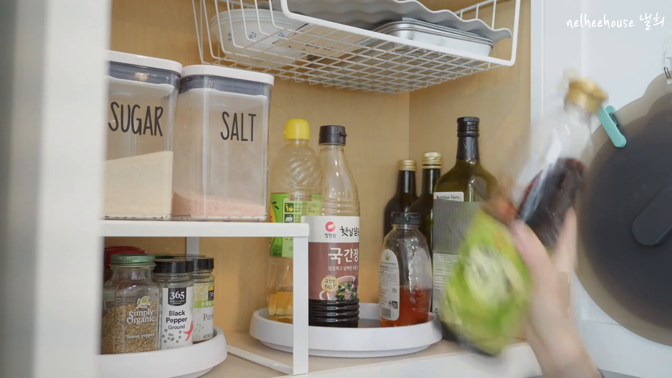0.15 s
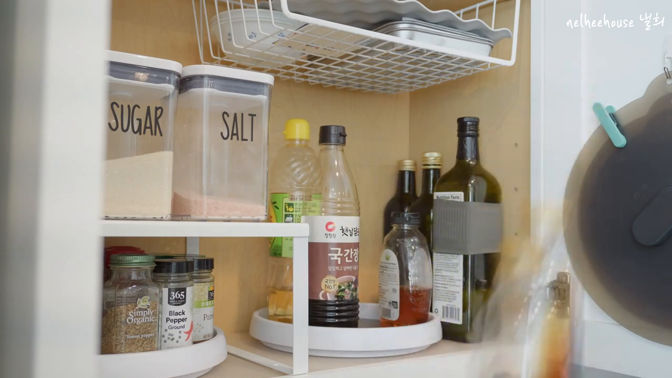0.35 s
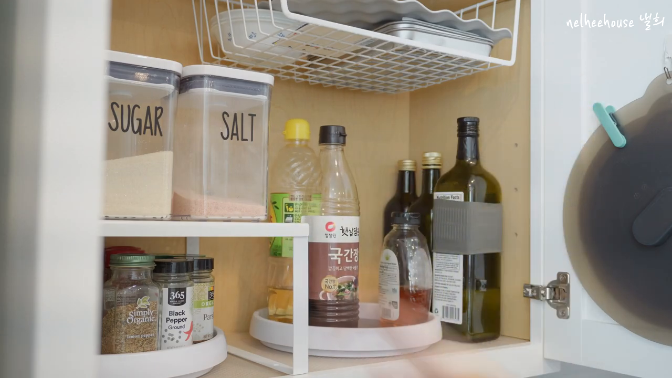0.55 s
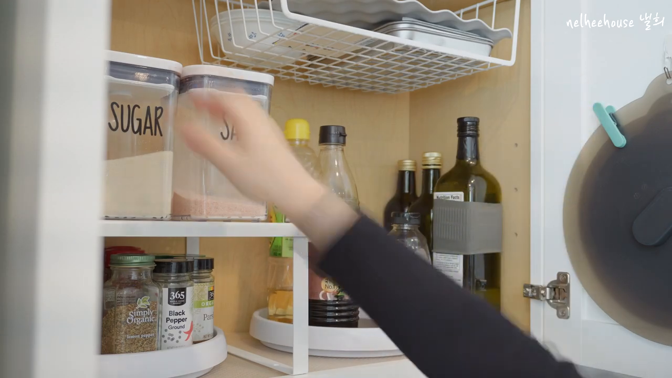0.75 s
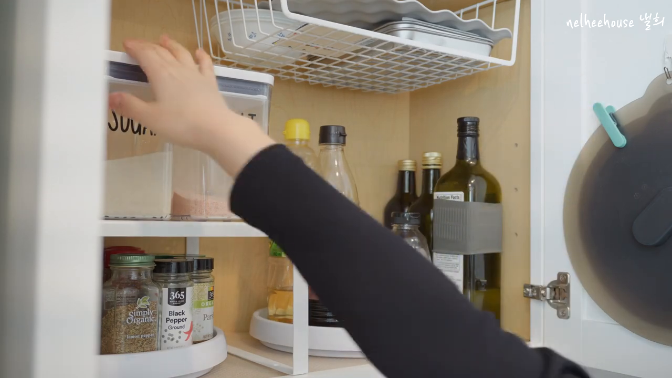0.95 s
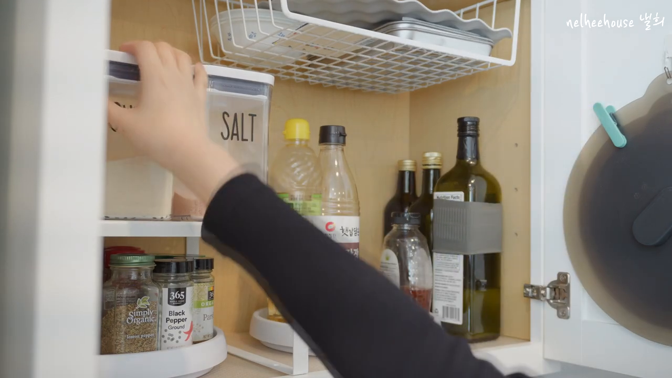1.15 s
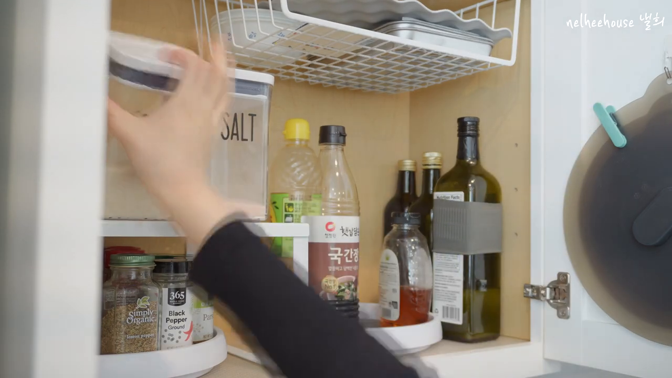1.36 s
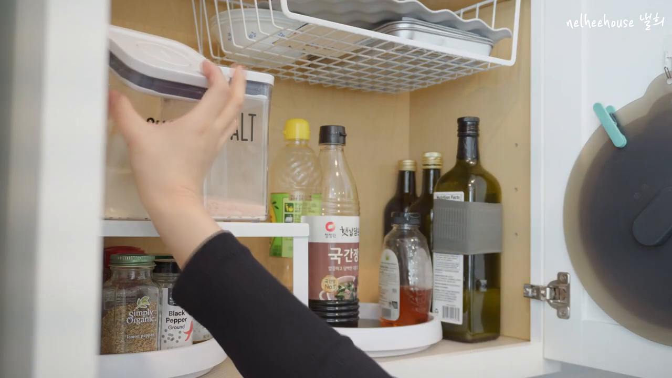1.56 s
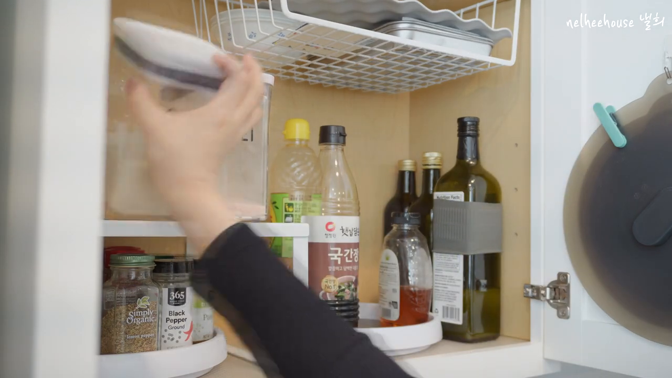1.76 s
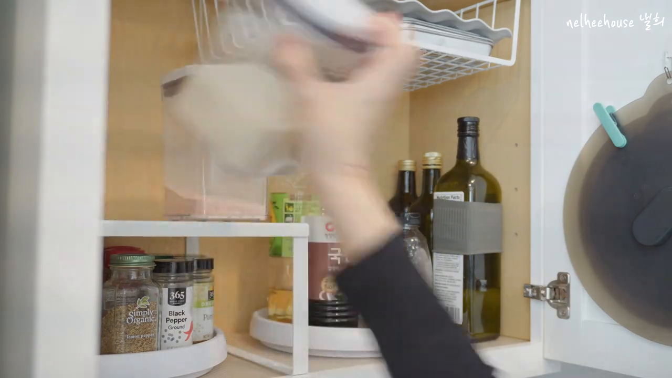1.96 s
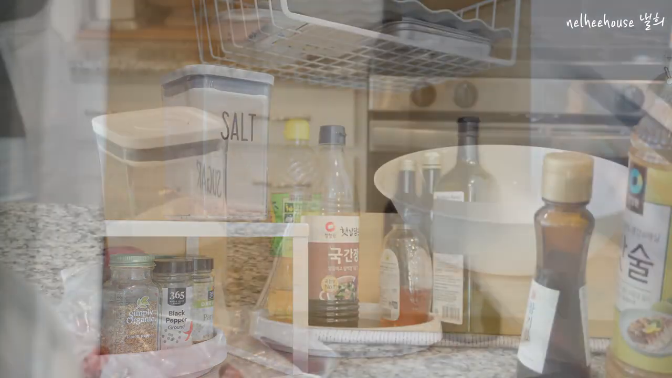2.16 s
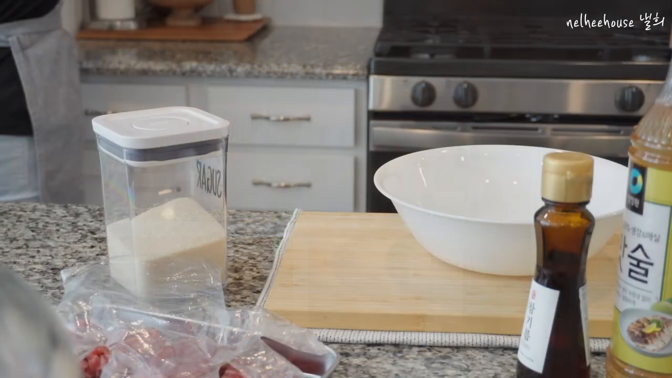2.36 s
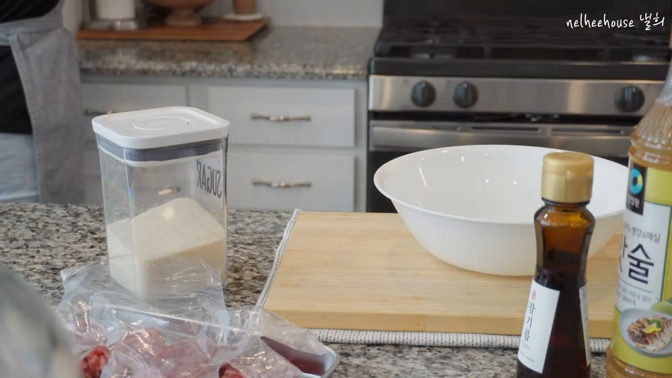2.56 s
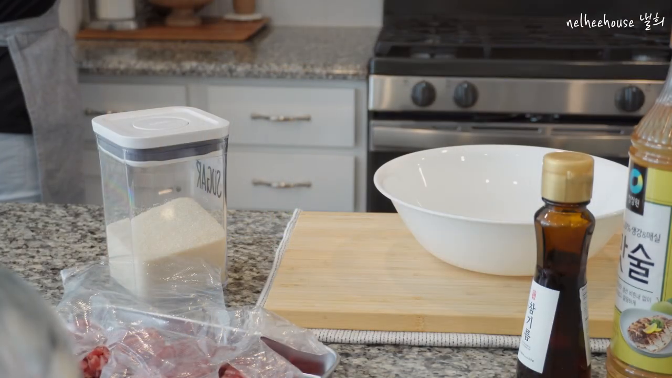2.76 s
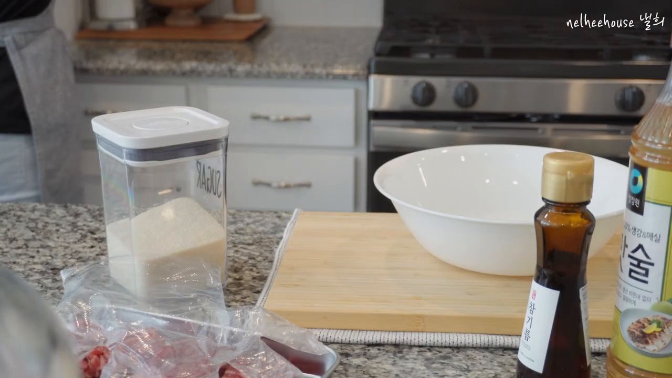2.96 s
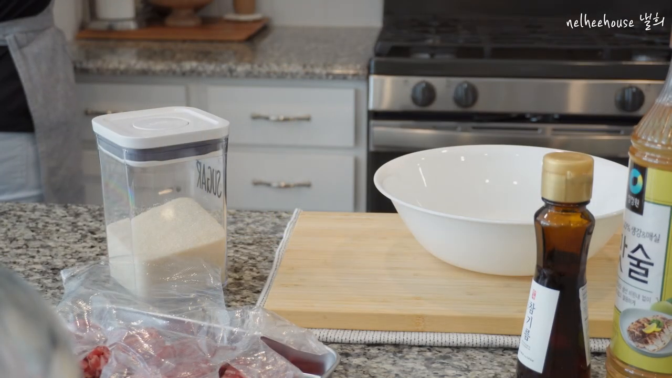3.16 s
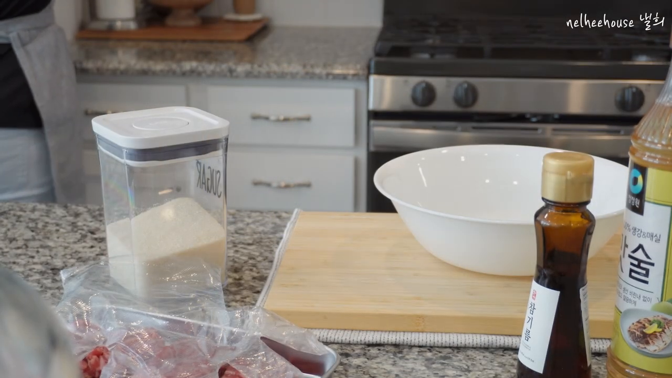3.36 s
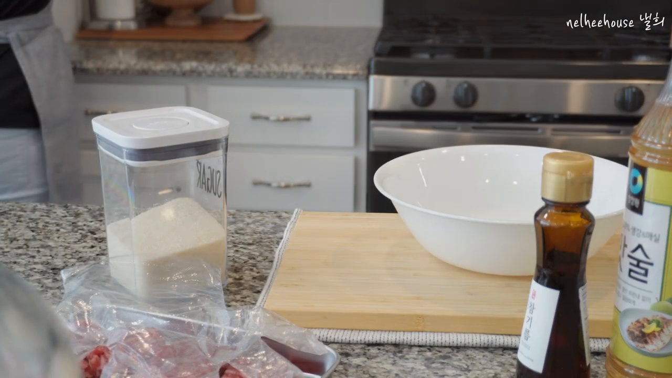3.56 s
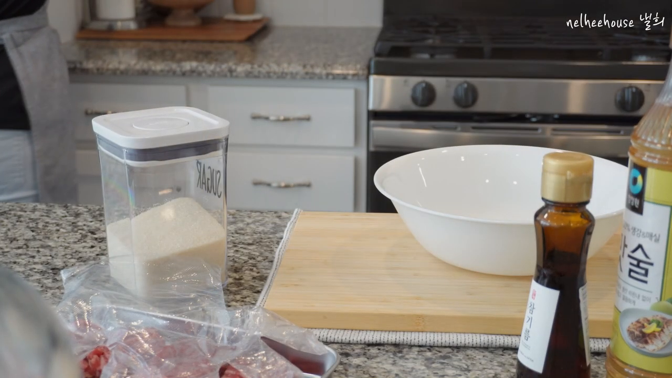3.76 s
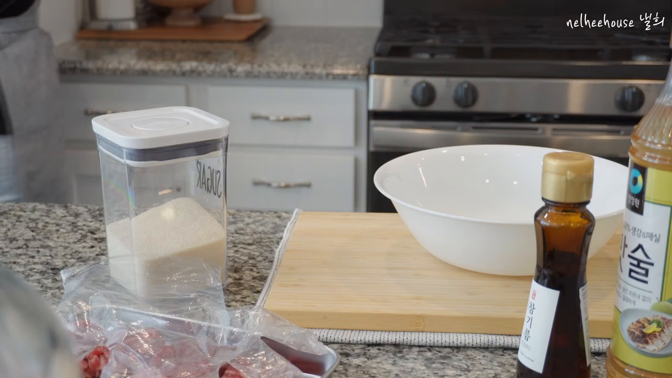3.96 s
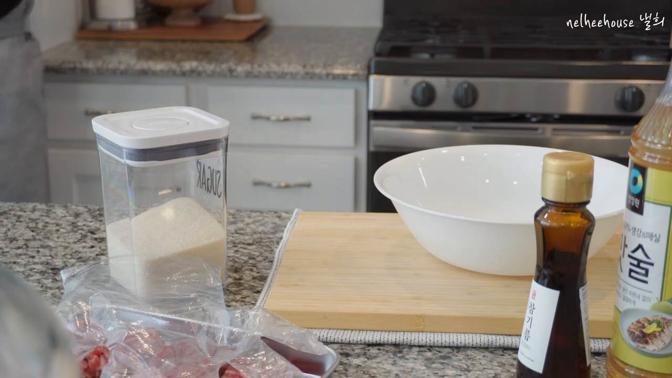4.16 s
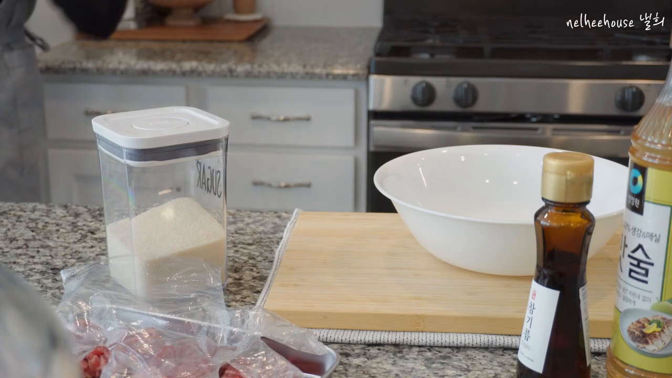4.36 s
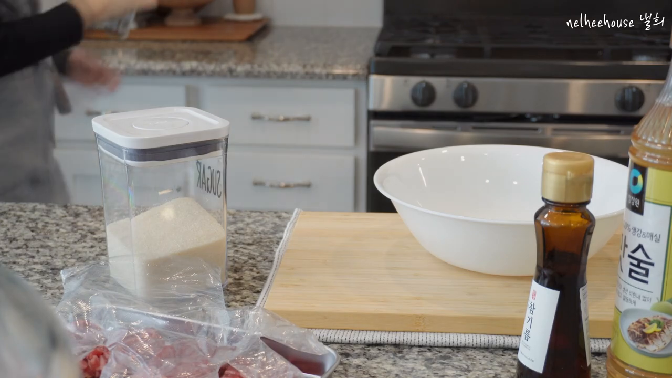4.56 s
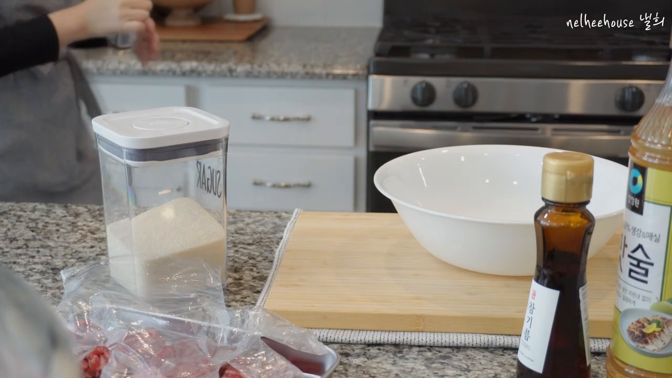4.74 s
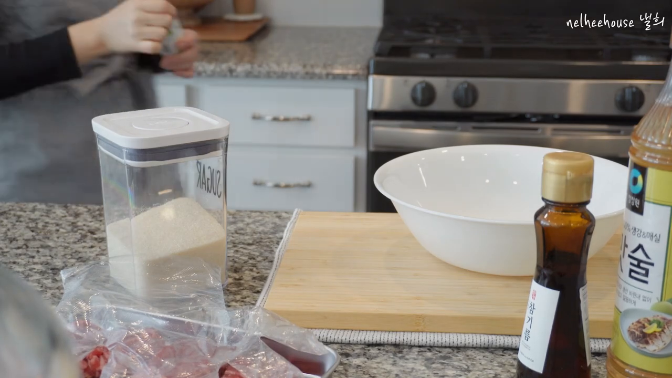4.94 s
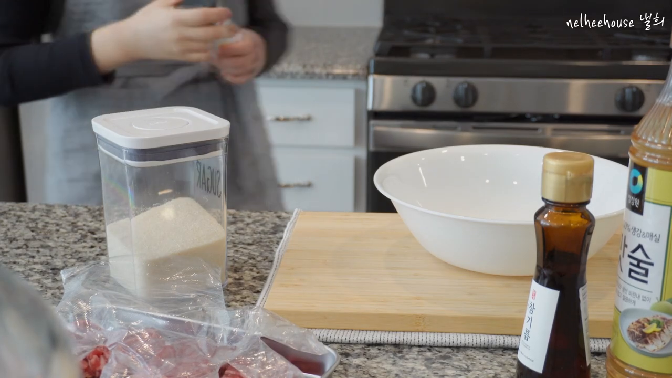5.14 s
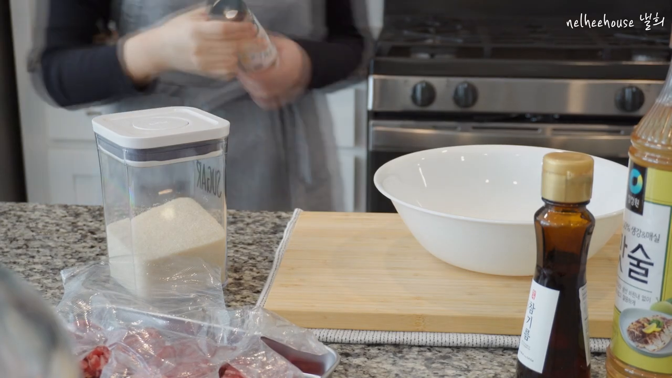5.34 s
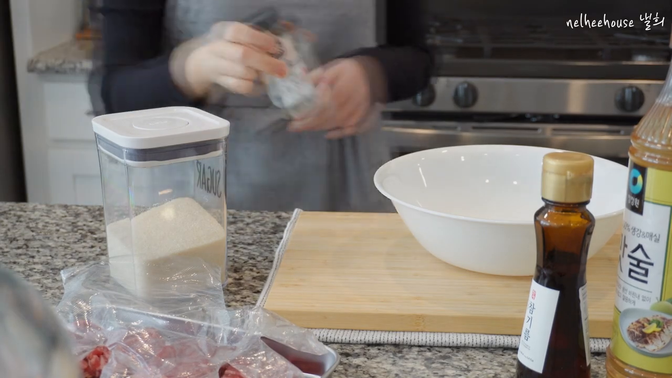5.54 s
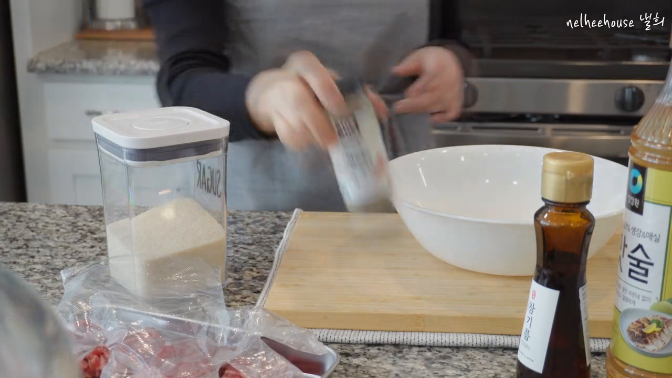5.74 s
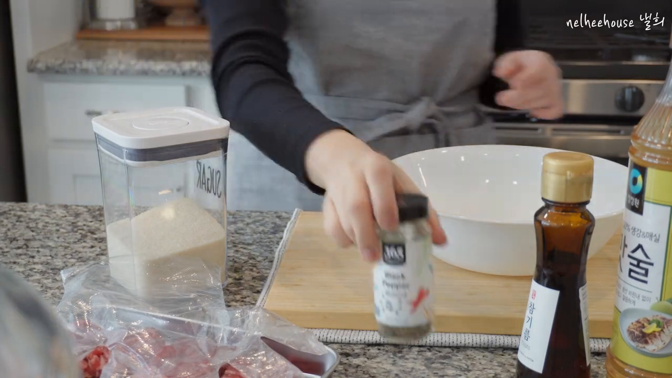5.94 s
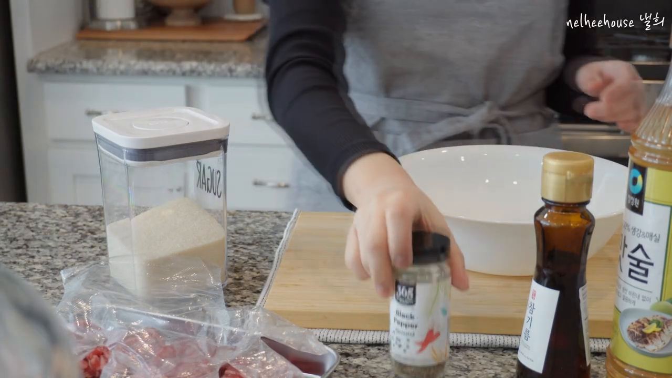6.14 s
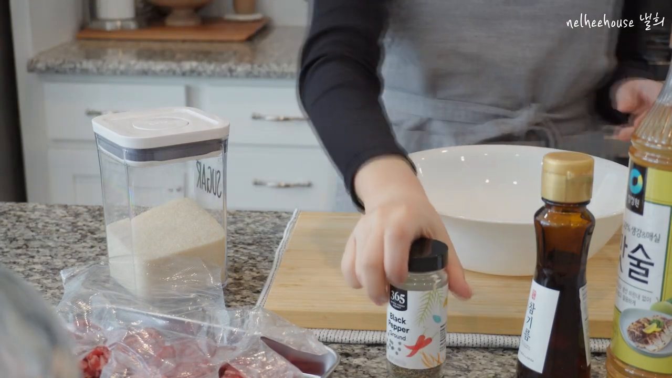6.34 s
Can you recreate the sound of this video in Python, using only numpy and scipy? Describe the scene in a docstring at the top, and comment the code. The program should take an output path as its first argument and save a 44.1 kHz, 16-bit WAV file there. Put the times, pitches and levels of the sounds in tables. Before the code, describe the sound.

At the very start, bottles bump each other and a cupboard shelf in a quick cluster, with a brush of sleeve. Around 0.5 seconds a hollow plastic canister taps and scrapes briefly, slightly to the left. Faint plastic ticks and dull shelf knocks follow until about 1.9 seconds. At 2.5 seconds small glass jars touch with a light tinkle, and cloth and thin plastic rustle softly. A clack comes from across the kitchen at 3.6 seconds. Jars clink at 3.9, and right after, just past 4 seconds, a cupboard door bangs loudly and shudders. Three light slipper steps slap closer at about 4.9, 5.4 and 5.9 seconds, with a soft distant knock at 5.1. At 6.3 seconds a full jar lands sharply on a stone counter, rocking for an instant. Hard walls give about a second of echo, over faint hiss and fridge hum.

```python
"""A kitchen with hard, echoing walls. A hand shifts bottles and a plastic canister in a cupboard; then small
glass jars clink, a cupboard door bangs, slippers slap closer and a jar is set down on a stone counter.
Each blow is a cluster of short contacts plus the damped modes, if any, of the thing struck.
Dense slips make the canister scrape, cloth rubs as flickering noise, and a fridge hums under room hiss."""
import sys
import numpy as np
from scipy import signal
from scipy.fft import rfft, irfft
from scipy.io import wavfile
from scipy.ndimage import uniform_filter1d

SR = 44100
rng = np.random.default_rng(int(sys.argv[2]) if len(sys.argv) > 2 else 0)


def bounce(signal):
    """Save signal as a 16-bit WAV file at the path given by the first command-line argument."""
    frames = np.transpose(np.atleast_2d(signal))
    limited = np.clip(frames, -1, 1)
    pcm = np.round(limited * 32767).astype(np.int16)
    wavfile.write(sys.argv[1], SR, pcm)


N = 282240
T = np.arange(N) / SR
# Stereo width of diffuse sound. Each row: frequency in Hz, side minus mid in dB.
SIDE_SHARE = [(60, -24), (250, -23), (700, -17), (2000, -13.5), (5000, -9), (10000, -5)]


def blows(hits, modes, width, thud_hz, thud_db, body_db, pan_db, spread_ms,
          ring_room_db=-12, body_hz=1150, rise_ms=0.012):
    """Contact clusters (crack, thud, body, tick) plus ringing modes; returns direct sound and room feed.
    Each hit: start in seconds, level in dB, crack in Hz, treble in dB, room send in dB.
    Each mode: frequency in Hz, level in dB, T60 in seconds."""
    direct, feed, size = np.zeros((2, N + SR)), np.zeros(N + SR), SR // 2
    t = np.arange(size) / SR
    fade = np.exp(-t * 1000 / spread_ms)
    rise = 1 - np.exp(-(t + 1 / SR) * 1000 / rise_ms)
    for start_s, db, crack_hz, treble_db, room_db in hits:
        force = crackle(0.97, size) * fade
        force[0] = 1.33  # clean first touch
        force = whiten(force) * fade ** 0.13 * rise  # short contacts have no pitch of their own
        force = whiten(force) * fade ** 0.096
        force = whiten(force) * fade ** 0.057
        crack = bandpass(force, crack_hz / (1 + width), crack_hz * (1 + width) ** 0.43)
        thud = bandpass(force, thud_hz / 2.14, thud_hz * 1.94)
        body = bandpass(force, body_hz / 1.505, body_hz * 1.76)
        tick = resonate(resonate(bandpass(force, 5000, 14000), 4400, 3250), 7000, 12000)
        parts = (crack, 0), (thud, thud_db), (body, body_db), (tick, treble_db)
        contact = sum(undb(part_db) * part / np.abs(part).max() for part, part_db in parts)
        ring = np.zeros(size)
        for mode_hz, mode_db, t60_s in modes:
            # harder, brighter contacts reach the high modes
            reach_db = 0.72 * (treble_db + 17) * np.clip(np.log2(mode_hz / 3000), 0, 1)
            swell = 1 - np.exp(-t * mode_hz / 3)
            ring += undb(mode_db + reach_db) * swell * decay(t, t60_s) * np.sin(2 * np.pi * mode_hz * t)
        i = int(start_s * SR)
        direct[:, i:i + size] += undb([[db + pan_db / 2], [db - pan_db / 2]]) * (contact + ring)
        feed[i:i + size] += undb(db + room_db) * (contact + undb(ring_room_db) * ring)
    return direct[:, :N], feed[:N]


def door_bang():
    """The cupboard door meets its frame and shudders."""
    hits = [(4.0423, -7.5, 2980, -4.5, 4), (4.0455, -12, 3670, -12, 5), (4.049, -6, 3460, -6, -1.5),
            (4.059, -8, 2460, -22, -13)]  # all hit and mode rows as in blows()
    modes = [(180.6, -18.5, 0.16), (255.1, -27, 0.63), (662.4, -22.5, 0.27), (888, -23, 0.089),
             (1020, -23, 0.081), (1337, -21, 0.11), (1562, -10, 0.063), (1900, -24, 0.16),
             (2334, -16, 0.25), (2317, -18, 0.31), (2940, -9.5, 0.13), (3336, -10.5, 0.18),
             (3854, -20, 0.21), (4470, -25, .15), (4447, -20.5, 0.25), (4996, -24, 0.046), (5230, -27, .03),
             (5760, -23.5, 0.12)]
    return blows(hits, modes, width=1.18, thud_hz=323, thud_db=-17.5, body_db=-4.5, pan_db=-1,
                 spread_ms=5.9, ring_room_db=-5.5)


def jar_landing():
    """A full jar lands and rocks on stone."""
    hits = [(6.312, -9.5, 3240, -13.5, -0.25), (6.3225, -11.5, 3500, -43, -0.71),
            (6.3308, -12, 2950, -39, -2.4), (6.3365, -7, 3100, -40, 1)]
    modes = [(214, -27.5, 0.26), (399, -14.5, 0.052), (710, -16, 0.031), (1008.6, -12.5, 0.15),
             (1140, -19, 0.077), (1650, -10.5, 0.024), (2120, -7.5, 0.023), (2720, 7.5, 0.0079),
             (2905, -8, 0.015), (3420, -6.5, 0.023), (4100, -11, 0.0077), (4700, -14, 0.015),
             (5400, -25, 0.015)]
    return blows(hits, modes, width=0.51, thud_hz=390, thud_db=-17.5, body_db=-6.5, pan_db=0,
                 spread_ms=1.87, ring_room_db=2.5)


def jar_clinks():
    """Small glass jars touch and ring."""
    hits = [(2.5195, -31, 3200, -12.5, -1), (3.924, -19, 2260, -36, -0.5), (3.943, -24, 2600, -11, -4.5),
            (3.961, -38.5, 2410, 1, -10)]
    modes = [(2440, -1, 0.03), (2660, -5, 0.02), (2900, -7, 0.02), (4250, -11, .02), (6580, -32, .22),
             (6665, -30, 0.33), (6765, -30, 0.3), (6730, -11, .03), (14300, -55, .08)]
    return blows(hits, modes, width=0.73, thud_hz=490, thud_db=-22.5, body_db=-9, pan_db=0.5,
                 spread_ms=5.6, ring_room_db=-1.5)


def bottle_bumps():
    """Bottles bump each other and the shelf."""
    hits = [(.002, -23, 2020, -12.5, -2), (.021, -25, 2930, -16, -7.5), (.055, -26.5, 2730, -19, -33),
            (.1, -40, 1940, -31, -13), (.123, -34, 2900, -21, -28)]
    modes = [(1450, -4, 0.036), (1780, -12, 0.11), (2170, -18, 0.045), (3510, -10, 0.041),
             (4590, -14.5, 0.069)]
    return blows(hits, modes, width=1.18, thud_hz=168, thud_db=-5.5, body_db=-21, pan_db=-1, spread_ms=9.5)


def clack():
    """Three quick touches across the kitchen, ringing briefly."""
    hits = [(3.5845, -27, 2590, -37, 7), (3.591, -26, 2960, -34, -5), (3.596, -25.5, 2480, -29, -14)]
    modes = [(760, -15, 0.03), (1970, -10, .012), (2500, -13, 0.01)]
    return blows(hits, modes, width=0.89, thud_hz=710, thud_db=-13, body_db=-17, pan_db=0.6,
                 spread_ms=5, ring_room_db=-21)


def slippers(heel_hz=2380, slap_delay_s=0.0049, heel_drier_db=7):
    """The heel lands; the sole slaps just after."""
    # Each row: start in seconds, heel in dB, slap in dB, slap in Hz, treble in dB, room send in dB.
    steps = [(4.931, -46, -50, 4180, -12, 10.5), (5.449, -35, -26, 3700, -7.5, 7.5),
             (5.92, -42, -31, 3020, -14.5, 9)]
    heels, slaps = [], []
    for start_s, heel_db, slap_db, slap_hz, treble_db, room_db in steps:
        heels.append((start_s, heel_db, heel_hz, treble_db, room_db - heel_drier_db))
        slaps.append((start_s + slap_delay_s, slap_db, slap_hz, treble_db, room_db))
    heel = blows(heels, [], width=1, thud_hz=183, thud_db=1.5, body_db=5.5, pan_db=-0.4, spread_ms=22.1)
    slap = blows(slaps, [], width=0.72, thud_hz=494, thud_db=-15.5, body_db=-6.5, pan_db=-0.4,
                 spread_ms=8.2, rise_ms=6.4, body_hz=1276)
    return mix(heel, slap)


def canister_taps():
    """Taps ring the hollow canister."""
    hits = [(.52, -29, 2460, -23, -5), (.534, -32.5, 3480, 3, -23), (.611, -31.5, 2410, -30, -7.5),
            (1.798, -49.5, 3000, -1, -4), (1.812, -47, 3040, -5, -6), (1.851, -47, 2840, -22, -19)]
    modes = [(600, -16, 0.038), (1285, -13, 0.04), (2160, -9, 0.02), (3070, -6, 0.056), (4200, -22, .03),
             (5100, -27, .03)]
    return blows(hits, modes, width=0.35, thud_hz=320, thud_db=-22, body_db=-36, pan_db=-3.5,
                 spread_ms=8.7)


def canister_scrape(room_db=-9):
    """Dense slips on the shelf excite the canister; the finest ones hiss, wide in stereo."""
    stroke = [(0.411, -58.5, -33), (0.434, -54.5, 10.5), (.465, -56.5, 3), (.505, -54, 14.5),
              (.535, -38.5, -2), (.565, -40, 5.5), (.59, -49, 9), (.605, -49, 1.5), (0.639, -53, -15)]  # Each row: time in seconds, level in dB, treble in dB.
    resonances = [(1390, 490, 1), (2330, 570, -1.5), (3040, 1860, 4.5), (4780, 2000, -4)]  # Each row: centre in Hz, width in Hz, level in dB.
    times_s, db, treble_db = np.transpose(stroke)
    grip = undb(2 * walk(154.4))
    slips = crackle(2.1, N) * grip
    body = unit(sum(undb(gain_db) * resonate_twice(slips, hz, width_hz)
                    for hz, width_hz, gain_db in resonances))
    top = unit(resonate(diffuse(N, SIDE_SHARE) * grip, 15300, 7000))
    level = undb(np.interp(T, times_s, db, -120, -120))
    slide = level * (body + undb(np.interp(T, times_s, treble_db)) * top)
    return slide * undb([[-0.7], [0.7]]), undb(room_db) * slide.mean(axis=0)


def lid_ticks():
    """Small bright ticks of plastic in the cupboard."""
    hits = [(.234, -31.5, 4550, -18, -4), (.43, -36.5, 3100, -26, -3), (.486, -34.5, 5340, -5, -2),
            (.96, -44, 2550, -15, 6), (1.232, -51, 5530, -6, -12), (1.401, -44.5, 2540, -7, -3)]
    modes = [(3010, -7, 0.035), (4900, -16, 0.05), (6000, -18, 0.042)]
    return blows(hits, modes, width=1, thud_hz=302, thud_db=-25, body_db=-10, pan_db=-3.5, spread_ms=7.9)


def far_bump():
    """A soft, broad knock across the kitchen."""
    hits = [(5.124, -42, 2180, -20, 3.6), (5.133, -35.5, 2400, -24, 4.9)]
    return blows(hits, [], width=1.2, thud_hz=467, thud_db=-11.5, body_db=-3.5, pan_db=0.4,
                 spread_ms=7.8, rise_ms=2.3)


def shelf_knocks():
    """Dull knocks on the shelf, mostly thud."""
    hits = [(1.064, -51.5, 3020, -24.5, -3), (1.17, -57, 1400, -24.5, -24), (1.401, -57, 1410, -20, 0),
            (1.547, -50.5, 1350, -20, -12)]
    modes = [(221, 4.5, 0.16), (562, 10.5, 0.071), (740, 6, 0.073)]
    return blows(hits, modes, width=0.32, thud_hz=544, thud_db=10, body_db=-7, pan_db=-0.5, spread_ms=13)


def glass_tinkles(t60_s=0.039, room_db=-9):
    """Tiny glass notes after the first clink, one damped sine each."""
    notes = [(2.545, -44, 3800), (2.577, -44, 5100), (2.596, -44, 4370)]  # Each row: start in seconds, level in dB, pitch in Hz.
    glass = np.zeros(N)
    for start_s, db, hz in notes:
        t = np.maximum(T - start_s, 0)
        glass += undb(db) * decay(t, t60_s) * np.sin(2 * np.pi * hz * t)
    return glass, undb(room_db) * glass


def rustle():
    """Sleeves, apron and plastic film rub in four flickering bands; single fibres tick."""
    # Each row: time in seconds, level in dB, treble in dB, lean to the dull band in dB.
    rubbing = [(0, -38.5, -20, 12), (.2, -55, -7, 2.5), (0.849, -57, -5.5, 3.5), (.97, -54, -9, -1),
               (1.08, -58, -9, 0.5), (1.2, -63, -9, 2), (1.7, -70, -6, 1), (1.8, -56, -8, 1),
               (1.95, -67.5, -12, 1.5), (2.27, -58, -6, 1.5), (2.468, -59, -16, 1.5), (2.6, -50.5, -26, 0),
               (2.76, -56.5, -18, 3), (2.89, -52, -2.5, 4.5), (3.08, -65.5, -18, 2.5),
               (3.16, -59, -12, 3.5), (3.3, -70, -24, 0.5), (4.54, -49, -14, 4.5), (4.88, -65.5, -39, 0),
               (5.0, -54, -29, 0), (5.43, -60.5, -7, 1), (5.7, -49, -11, 1), (6.3, -64, -19, 2)]
    low_levels = [(0, -38.5), (.2, -68.5), (.8, -66), (1.12, -57), (1.35, -65), (1.6, -59.5), (2.1, -73.5),
                  (2.75, -64), (3.4, -73.5), (5.1, -65.5), (6.4, -76)]  # Each row: time in seconds, level in dB.
    times_s, *curves_db = np.transpose(rubbing)
    level, treble, lean = (undb(np.interp(T, times_s, db)) for db in curves_db)
    fibres = diffuse(N, SIDE_SHARE) * undb(rng.exponential(size=N))
    flicker_db = walk(25)
    low, dull, bright, top = (unit(resonate_twice(fibres, hz, width_hz)) * undb(flicker_db + walk(27))
                              for hz, width_hz in ((620, 320), (2000, 1870), (4000, 2390), (7500, 34000)))
    low *= undb(np.interp(T, *np.transpose(low_levels)) + 1.2 * walk(14))
    middle = (dull * lean + bright / lean) / np.sqrt(lean ** 2 + lean ** -2)
    return level * (middle + treble * top) + low


def wall_echoes(feed, gap_ms=0.59, build_ms=0.26):
    """Hard walls: dense echoes build up after a gap and die sooner in the treble."""
    decay_times = [(125, 0.74), (400, 0.79), (1000, 1), (2500, 1), (5000, 0.73), (8000, 0.52),
                   (13000, 0.46)]  # Each row: frequency in Hz, T60 in seconds.
    size = int(1.5 * SR)
    t, hz = np.arange(size) / SR, np.fft.rfftfreq(size, 1 / SR)
    spectrum, echoes = rfft(diffuse(size, SIDE_SHARE)), 0
    for centre_hz in 62.5 * 2 ** np.arange(0, 8.6, 0.5):
        half_octave = np.clip(1 - 2 * np.abs(np.log2(np.maximum(hz, 1) / centre_hz)), 0, 1)
        echoes += irfft(spectrum * half_octave, size) * decay(t, on_log(decay_times, centre_hz))
    echoes *= 1 - np.exp(-np.maximum(t * 1000 - gap_ms, 0) / build_ms)
    echoes /= np.sqrt(np.sum(echoes[0] ** 2))
    return signal.fftconvolve(feed[None], echoes, axes=1)[:, :N]


def fridge_hum(hz=120.2, width_hz=13):
    """A sine plus narrow noise that makes it waver."""
    levels = [(0, -64), (2.1, -83), (2.4, -64), (6.4, -62.5)]  # Each row: time in seconds, level in dB.
    waver = unit(resonate(rng.standard_normal(N), hz, width_hz))
    return undb(np.interp(T, *np.transpose(levels))) * (0.8 * np.sin(2 * np.pi * hz * T) + 0.65 * waver)


def room_hiss(level_db=-57.5):
    """Steady noise floor, wide because each microphone adds its own hiss."""
    spectrum = [(20, -12), (45, -4), (90, -5.5), (180, -0.5), (390, -9.5), (560, -7), (1000, -14),
                (1900, -17), (3500, -21.5), (6000, -36), (11000, -24.5), (13500, -25.5)]  # Each row: frequency in Hz, relative density in dB.
    side_share = [(30, -22), (60, -14), (150, -10), (500, -4), (2000, -2.5), (8000, 0)]  # columns as SIDE_SHARE
    return undb(level_db) * unit(colour(diffuse(N, side_share), spectrum))


def undb(db):
    return 10 ** (np.asarray(db) / 20)


def unit(x):
    """Scale to rms 1."""
    return x / np.sqrt(np.mean(x ** 2) + 1e-30)


def decay(t, t60_s):
    return np.exp(-np.log(1000) * t / t60_s)


def on_log(table, hz):
    """Read (Hz, value) rows on a log-frequency axis."""
    points_hz, values = np.transpose(table)
    return np.interp(np.log(np.maximum(hz, 1)), np.log(points_hz), values)


def colour(x, gains):
    """Filter by (Hz, dB) rows."""
    size = x.shape[-1]
    return irfft(rfft(x) * undb(on_log(gains, np.fft.rfftfreq(size, 1 / SR))), size)


def whiten(x):
    """Same phases, flat spectrum."""
    return irfft(np.exp(1j * np.angle(rfft(x))), len(x))


def resonate(x, hz, width_hz):
    """Two-pole resonance, gain 1 at the centre, Q limited."""
    return signal.lfilter(*signal.iirpeak(hz, np.clip(hz / width_hz, 0.55, 99), SR), x)


def resonate_twice(x, hz, width_hz):
    return resonate(resonate(x, hz, width_hz), hz, 2 * width_hz)


def bandpass(x, lo_hz, hi_hz):
    return signal.sosfilt(signal.butter(3, [lo_hz, hi_hz], "band", fs=SR, output="sos"), x)


def walk(rate_hz):
    """Random levels, held and slewed."""
    hold = int(SR / rate_hz)
    return uniform_filter1d(np.repeat(rng.standard_normal(N // hold + 1), hold), hold)[:N]


def diffuse(size, side_share):
    """Noise at two close microphones: alike in the bass, less so in the treble."""
    mid, side = rng.standard_normal((2, size))
    side = colour(side, side_share)
    return np.array([mid + side, mid - side])


def crackle(scatter_db, size):
    """Heavy-tailed noise: many tiny separate contacts."""
    return unit(rng.standard_normal(size) * undb(scatter_db * rng.exponential(size=size)))


def mix(*sources):
    """Sum (direct sound, room feed) pairs."""
    return [sum(signals) for signals in zip(*sources)]


def scene():
    direct, feed = mix(bottle_bumps(), canister_taps(), lid_ticks(), shelf_knocks(), far_bump(), clack(),
                       slippers(), jar_clinks(), door_bang(), jar_landing(), canister_scrape(),
                       glass_tinkles())
    return direct + wall_echoes(feed) + rustle() + room_hiss() + fridge_hum()


def record(dry, mic_rolloff_hz=9080, cutoff_hz=15650):
    """The microphone dulls the treble; a steep low-pass cuts the top."""
    dull = signal.sosfilt(signal.butter(3, mic_rolloff_hz, fs=SR, output="sos"), dry)
    return signal.sosfilt(signal.ellip(12, 0.2, 80, cutoff_hz, fs=SR, output="sos"), dull)


dry = scene()
out = record(dry)
bounce(out)
```